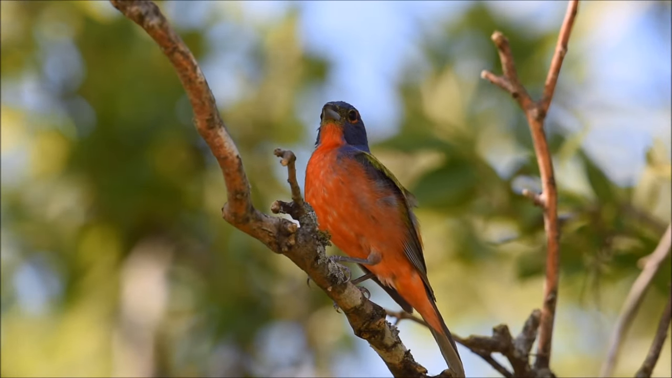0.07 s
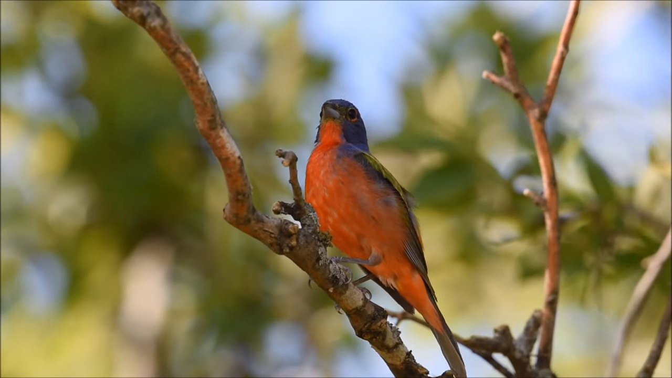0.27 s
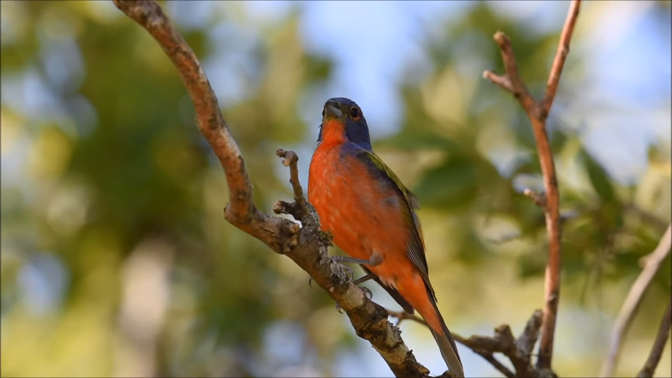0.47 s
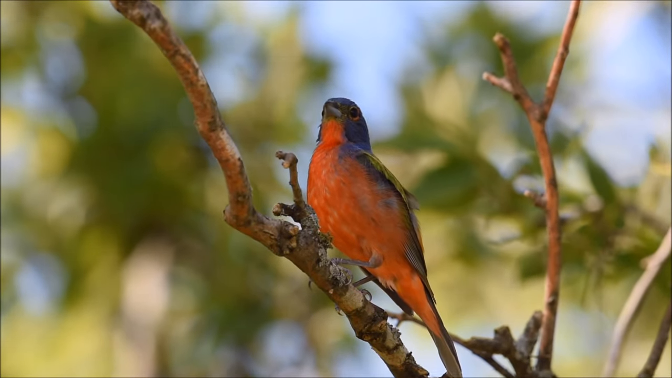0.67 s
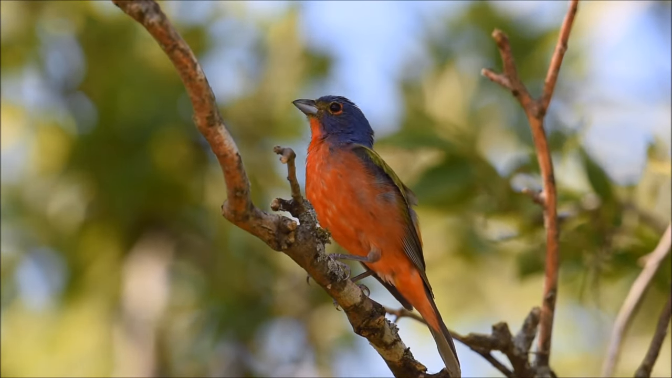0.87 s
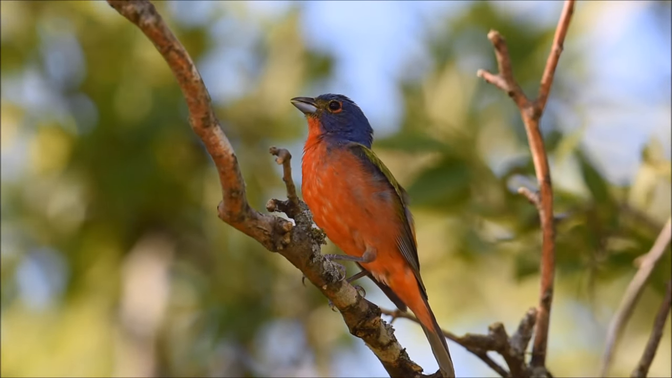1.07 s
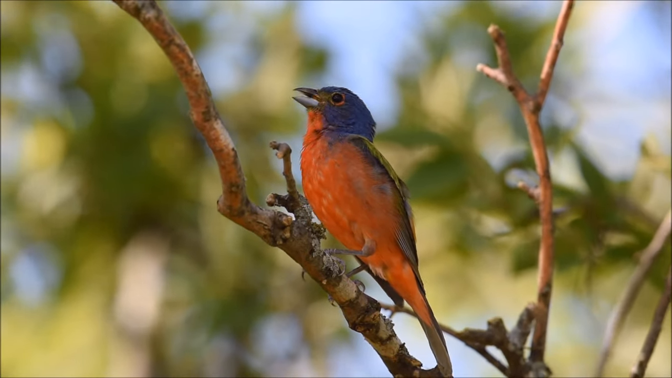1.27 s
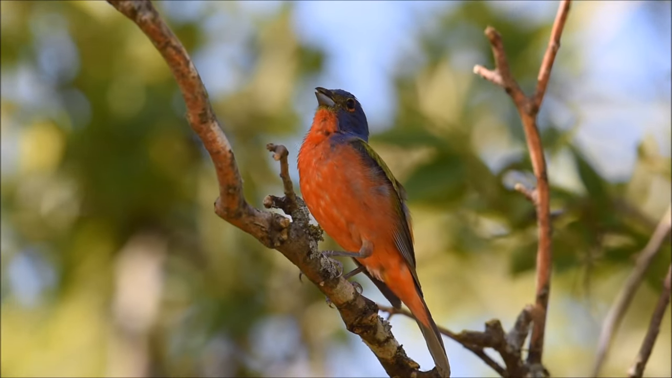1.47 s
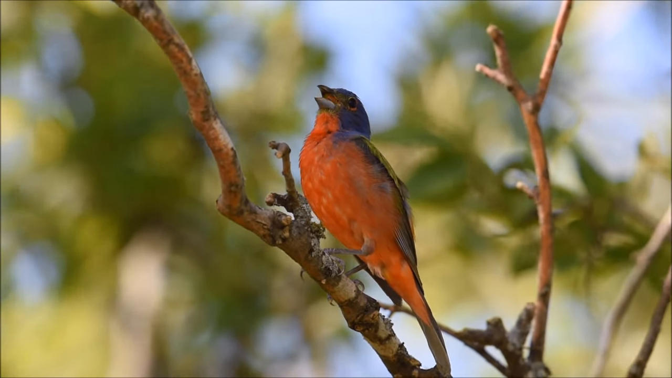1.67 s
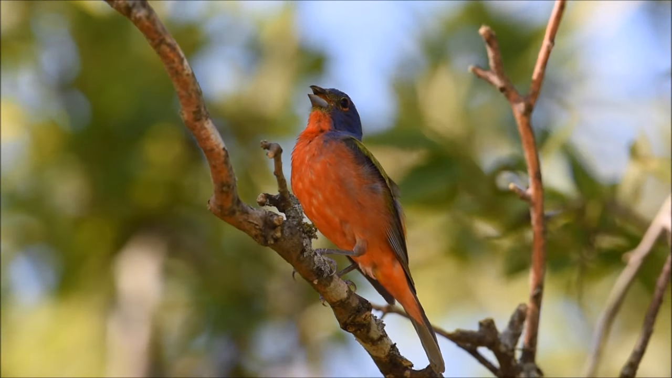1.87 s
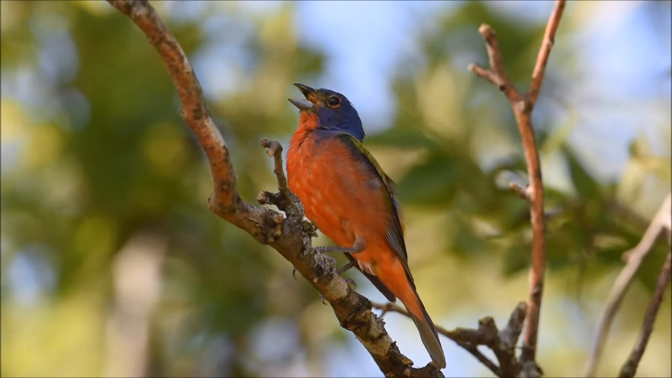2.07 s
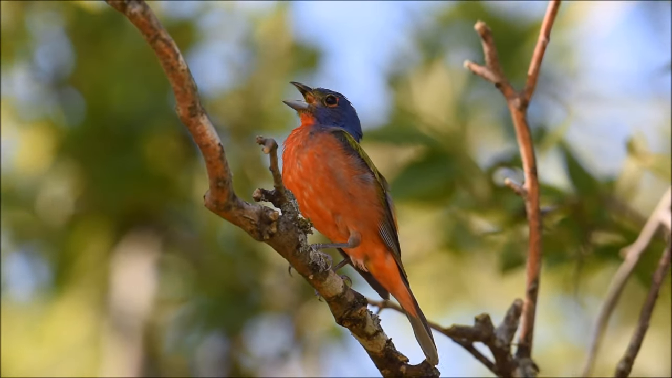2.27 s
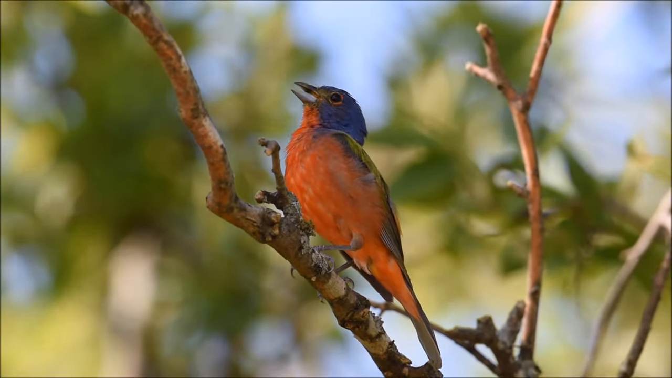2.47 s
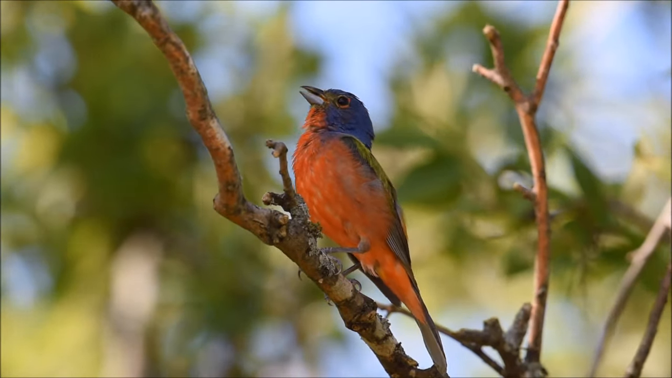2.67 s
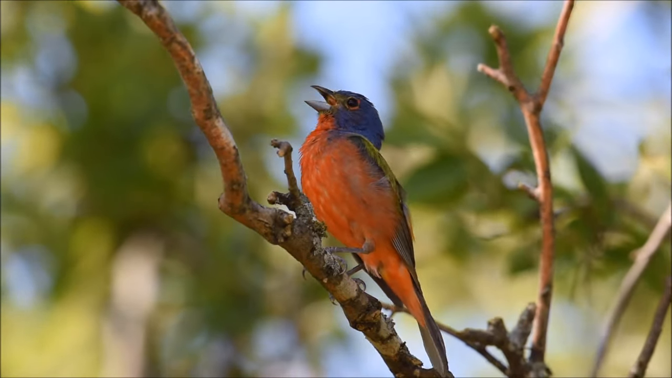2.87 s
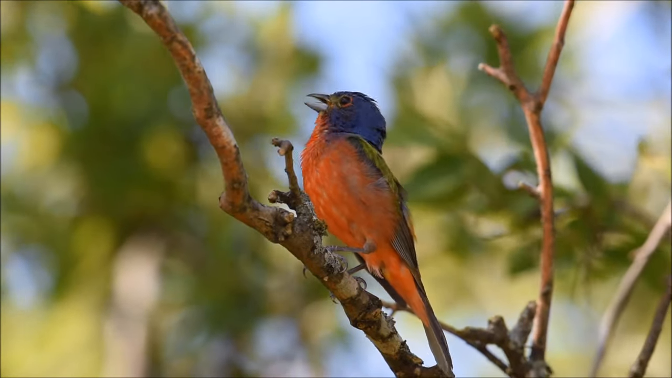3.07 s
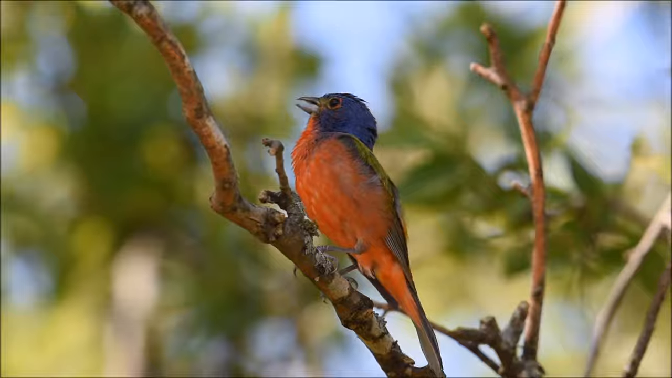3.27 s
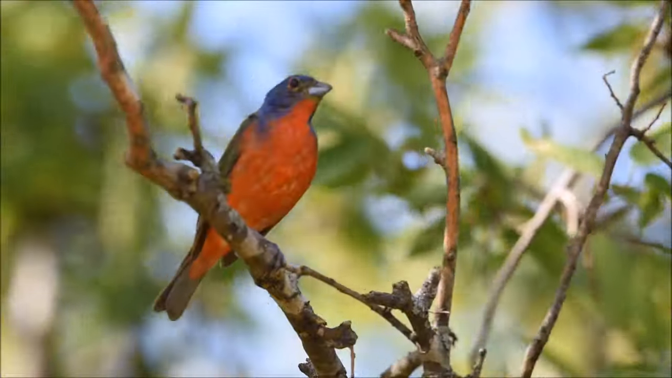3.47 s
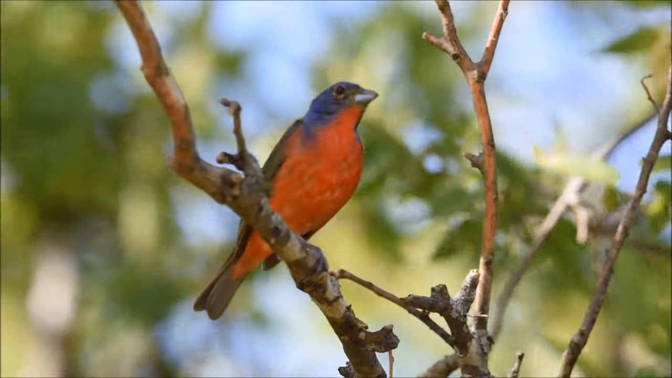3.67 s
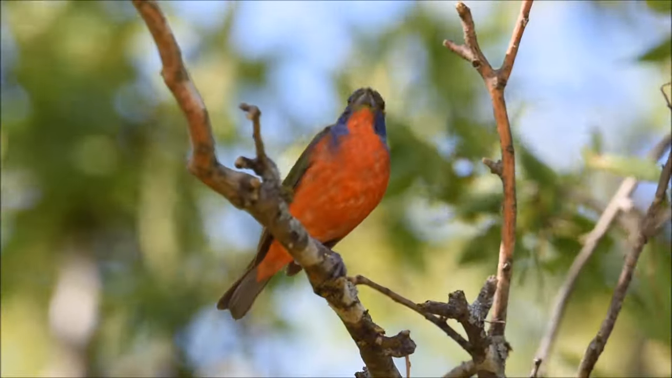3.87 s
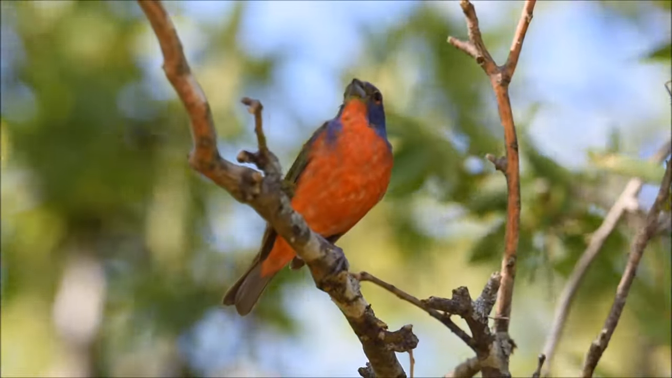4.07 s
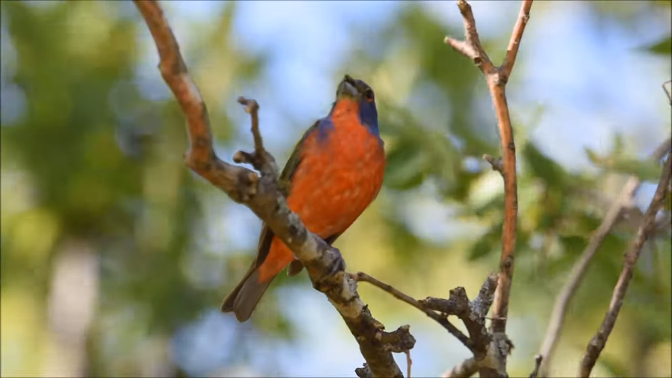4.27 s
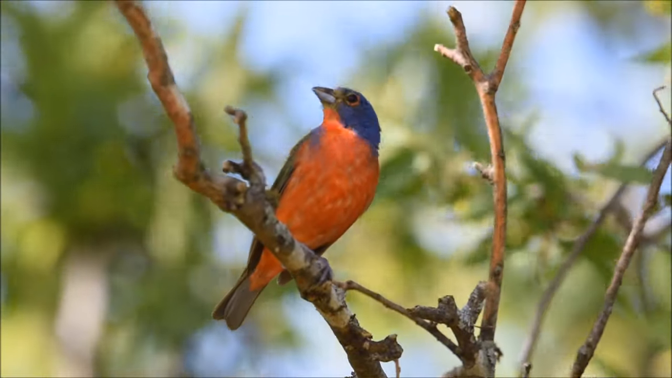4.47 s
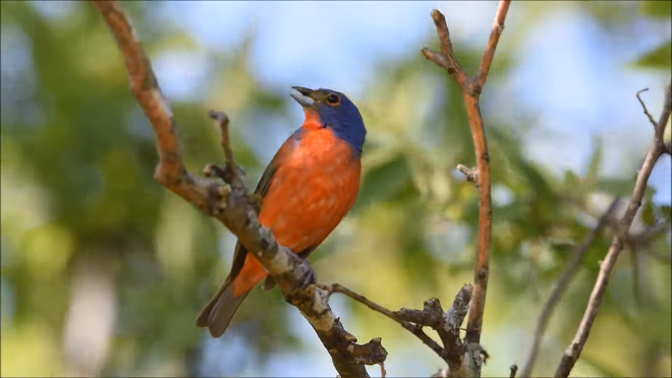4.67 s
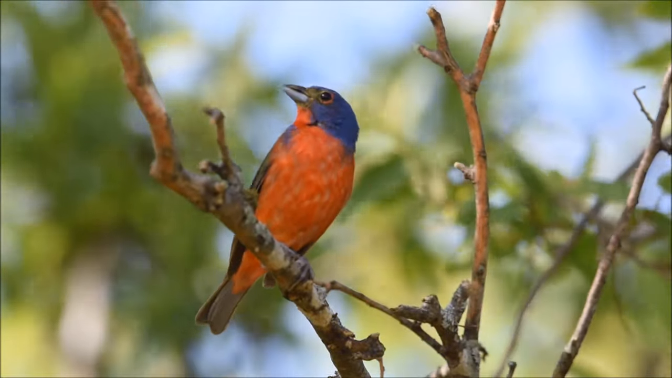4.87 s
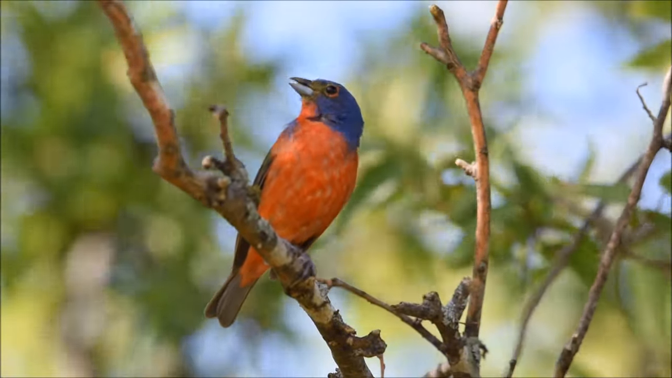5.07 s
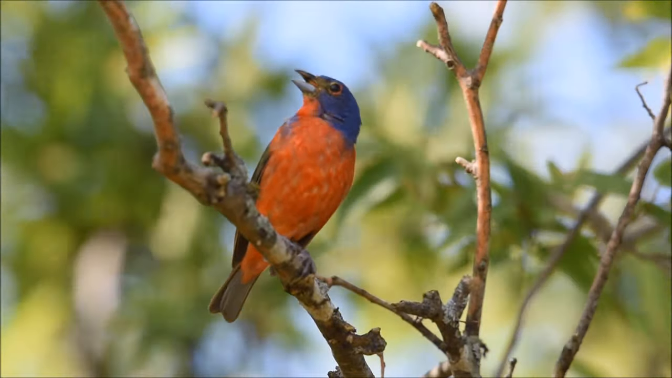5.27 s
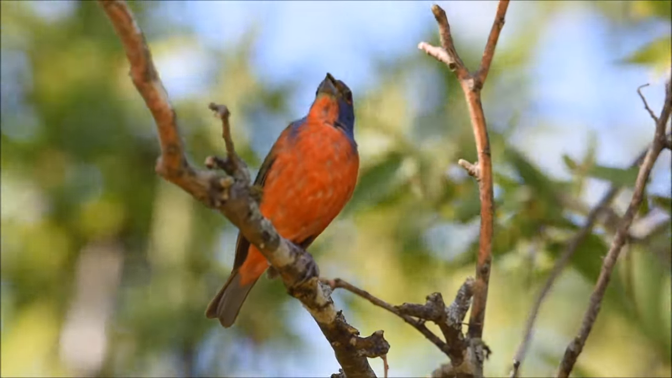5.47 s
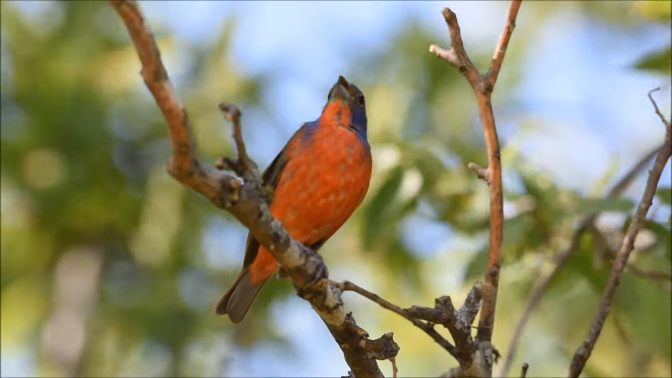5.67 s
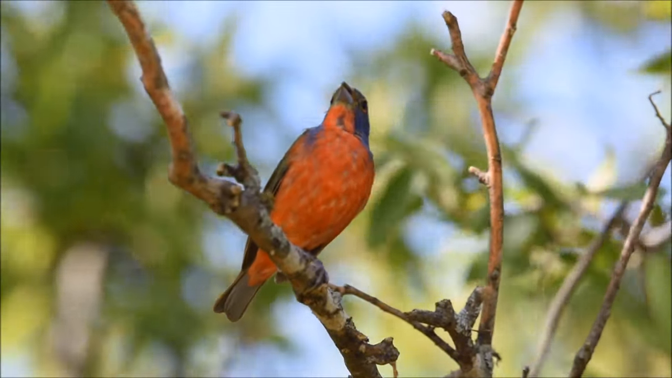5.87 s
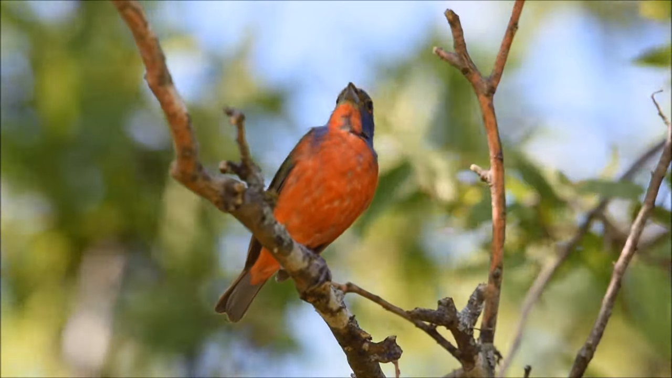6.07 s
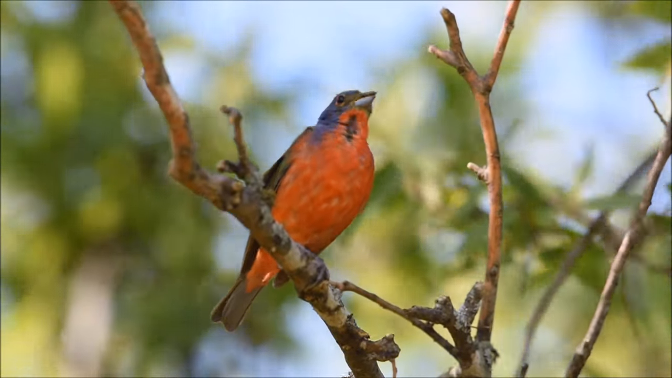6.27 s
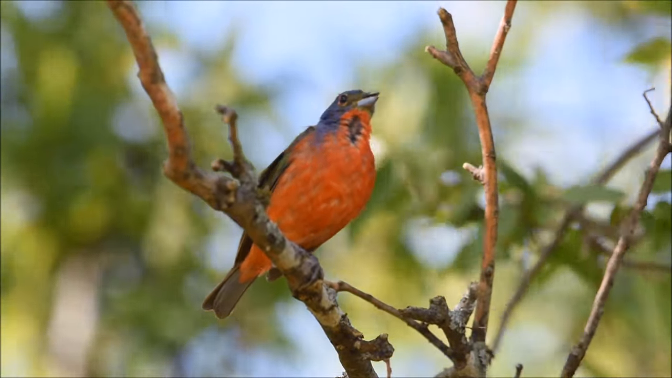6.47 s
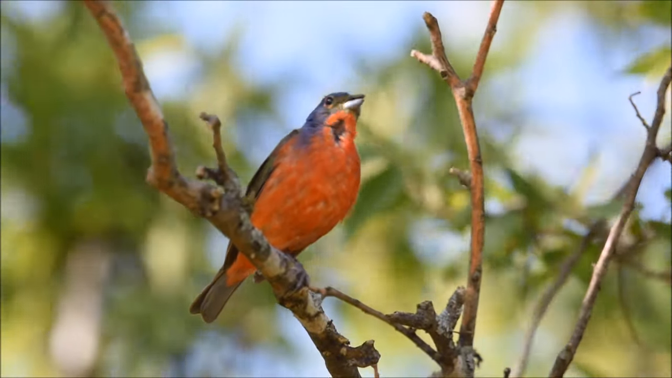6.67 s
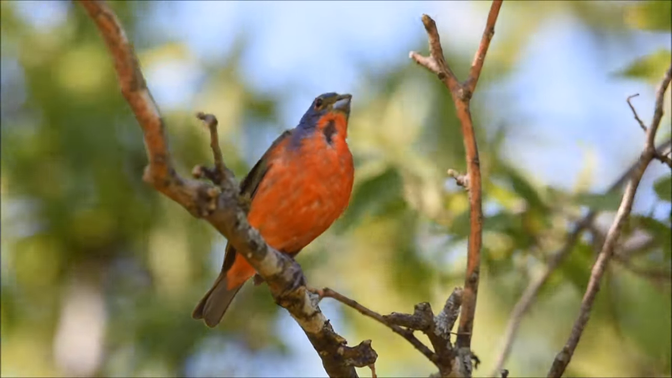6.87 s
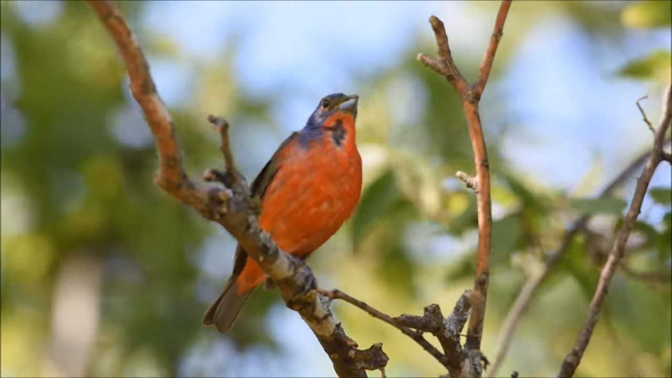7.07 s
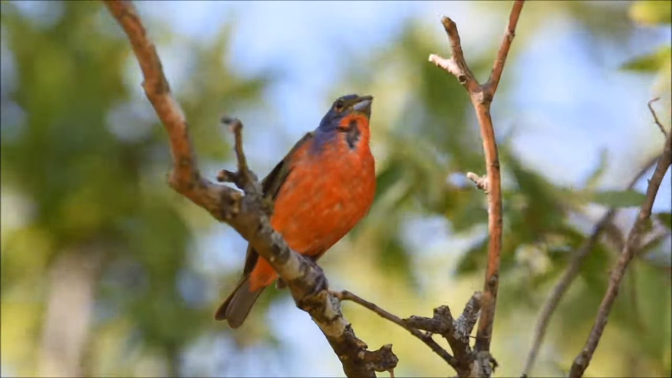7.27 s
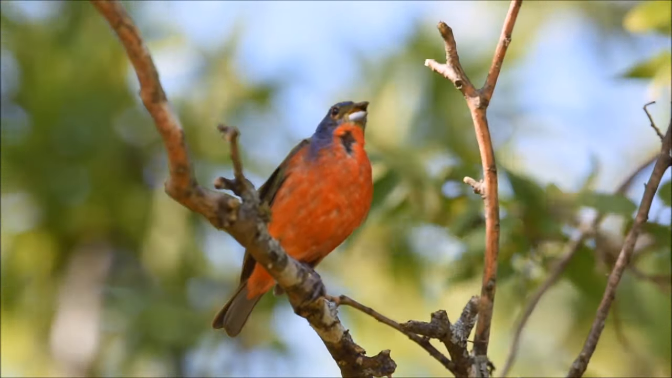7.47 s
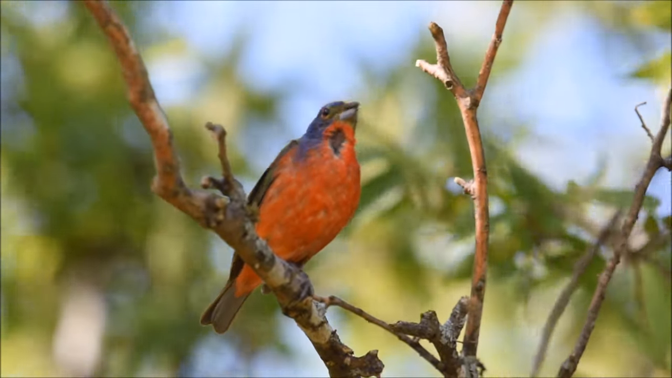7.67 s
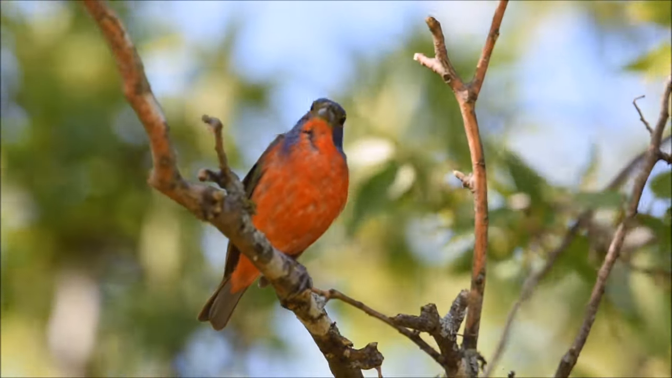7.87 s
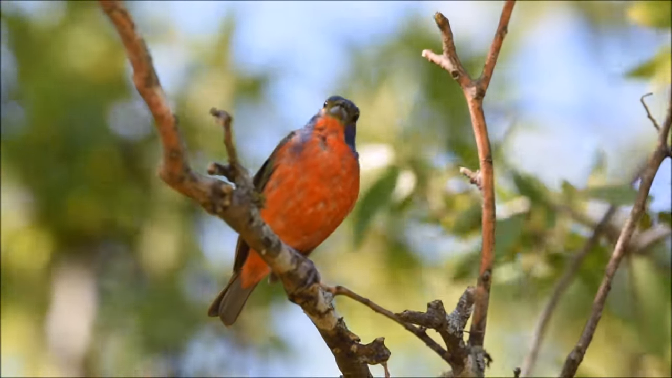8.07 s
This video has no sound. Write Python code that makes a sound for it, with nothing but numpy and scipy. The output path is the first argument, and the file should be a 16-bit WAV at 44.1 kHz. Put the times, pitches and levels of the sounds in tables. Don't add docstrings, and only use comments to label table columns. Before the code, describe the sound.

Close outdoor listening to one small bird on a branch, fairly dry with short scattered echoes from foliage. Its first quick high warble grows from soft chirps and stops at a brief total silence. A second song starts timidly, peaks, then softens towards the end. Behind it are a steady hollow distant hum, a passing low vehicle rumble during the first song, sparse twig ticks, faint leaf rustles, camera hiss and a soft final thud.

```python
import sys
import numpy as np
from scipy import signal
from scipy.fft import irfft, next_fast_len
from scipy.io import wavfile
from scipy.ndimage import uniform_filter1d

SR = 44100
rng = np.random.default_rng(int(sys.argv[2]) if len(sys.argv) > 2 else 0)


def ratio(d):
    e = np.asarray(d, float) / 20
    return 10 ** e


def digitize_waveform(pressure):
    field = np.atleast_2d(pressure).T
    bounded = np.clip(field, -1, 1)
    quanta = np.round(bounded * 32767).astype(np.int16)
    wavfile.write(sys.argv[1], SR, quanta)


N = 357651
TIME = np.arange(N) / SR
OPPOSITE = np.array([[1], [-1]])


def random_phase_noise(gain):
    return irfft(gain * np.exp(2j * np.pi * rng.random(len(gain))))[:N]


def noise_freqs():
    return np.fft.rfftfreq(next_fast_len(N), 1 / SR) + 1


def band(hz, width, order=2):
    f = noise_freqs()
    detune = (f - hz ** 2 / f) / width
    x = random_phase_noise((1 + detune ** 2) ** (-order / 2))
    return x / x.std()


def walk(rate):
    k = int(SR / rate)
    held = np.repeat(rng.standard_normal(N // k + 1), k)
    return 1.52 * uniform_filter1d(uniform_filter1d(held, k), k)[:N]


def pan(db):
    return ratio(np.array([db / 2, -db / 2]).reshape(2, -1))


CUT_S = (3.364, 3.408)


def by_take(first_db, second_db):
    return ratio(np.where(TIME < CUT_S[1], first_db, second_db))


# frequency in Hz, density in dB per Hz.
AIR = [(12, -43), (20, -4), (123, -8), (377, -15.5), (434, -12), (607, -5.5), (849, -17.5), (1030, -16),
       (1660, -19), (14300, -28.5), (16000, -36.5)]
AIR_DB = (-56.5, -55)


def air(apart_hz=2500):
    f = noise_freqs()
    hz, db = np.transpose(AIR)
    gain = ratio(np.interp(np.log(f), np.log(hz), db))
    side_share = 0.16 + 0.36 * f ** 2 / (f ** 2 + apart_hz ** 2)
    mid = random_phase_noise(gain * np.sqrt(1 - side_share))
    side = random_phase_noise(gain * np.sqrt(side_share))
    drift = ratio(0.28 * walk(6.1))
    return by_take(*AIR_DB) * drift * (mid + side * OPPOSITE) / mid.std()


# centre in Hz, width in Hz, level in dB before the scene changes,
# level in dB after it, left minus right in dB.
DRONE = [(253.5, 46, -70.5, -65.5, 0.5), (309, 64, -70, -63, -1), (443.6, 32, -56.5, -53.5, 0.5),
         (586.6, 69, -56, -57, -6), (674, 64, -58, -57, 4), (744.6, 44, -61.5, -58, -2.5),
         (916, 44, -72.5, -70, -3.5), (1018, 39, -66, -68, -2), (1190, 72, -79, -76, 4),
         (1956, 150, -70, -71.5, 0.5), (2191, 98, -72.5, -70.5, 1), (2640, 77, -78, -85, 8.5),
         (3650, 170, -77, -75.5, 3), (4300, 99, -74, -86.5, 0)]


def drone(apart_db=-15):
    out, throb = 0, walk(7)
    throb = throb - uniform_filter1d(throb, size=SR // 2)
    for hz, width, first_db, second_db, pan_db in DRONE:
        level = by_take(first_db, second_db) * ratio(1.9 * throb + 0.7 * walk(2.917))
        spread = ratio(apart_db) * band(hz, width) * OPPOSITE
        out = out + level * pan(pan_db) * (band(hz, width) + spread)
    return out


# time in seconds, level in dB.
RUMBLE = [(0, -59), (1.45, -60), (1.7, -54), (2.2, -53), (2.55, -48), (2.8, -49), (2.97, -52.5), (3.1, -59),
          (3.6, -61), (8.1, -61)]


def rumble():
    swell_db = np.interp(TIME, *np.transpose(RUMBLE)) - 2.0
    level = ratio(swell_db + 1.24 * walk(6))
    return level * (band(115, 100) + 0.088 * band(130, 60) * OPPOSITE)


# start in seconds, peak in dB.
TICKS = [(1.2124, -46), (1.2276, -37), (1.2605, -43), (1.3508, -36), (1.3747, -34), (3.8636, -51),
         (6.4694, -58), (7.1894, -40)]


def ticks(out, level_db=-3, decay_s=0.0003):
    t = np.arange(256) / SR
    for s, db in TICKS:
        crack = np.diff(rng.standard_normal(256) * np.exp(-t / decay_s), prepend=0)
        a = int(s * SR)
        out[a:a + 256] += ratio(db + level_db) * uniform_filter1d(crack, size=2)


def rustle(length, hz):
    u = np.linspace(0, 1, num=int(length * SR))
    edges = [0.55 * hz, min(1.7 * hz, SR / 2.2)]
    sos = signal.butter(2, edges, "bandpass", fs=SR, output="sos")
    noise = signal.sosfilt(sos, rng.standard_normal(len(u) + 2000))[2000:]
    grains = int(length * 300) + 2
    grain = np.interp(u, np.linspace(0, 1, num=grains), rng.standard_normal(grains))
    return ratio(2.5 * grain) * np.sin(np.pi * u) ** 0.6 * noise / noise.std()


# start in seconds, length in seconds,
# level in dB, centre in Hz.
RUSTLES = [(1.756, 0.12, -60.5, 6000), (1.859, 0.02, -53, 5500), (3.462, 0.013, -49.5, 1830),
           (3.51, .08, -59, 1000), (3.62, .08, -57, 1500), (3.72, .1, -62, 1800), (3.9, .06, -58, 900),
           (3.855, 0.021, -53, 4900), (7.9, .065, -53, 500), (2.64, 0.073, -61, 13000),
           (8.066, 0.025, -50, 750), (1.348, .04, -63, 7000), (1.222, .012, -63, 7000),
           (2.975, .035, -65, 13000), (6.04, .04, -65, 12000), (5.86, .04, -66, 12000),
           (3.1, .26, -60, 190), (3.42, .1, -58, 220), (3.858, .014, -60, 11000), (1.862, .014, -60, 13000)]


def rustles(out):
    for s, length, db, hz in RUSTLES:
        a = int(s * SR)
        out[a:a + int(length * SR)] += ratio(db) * rustle(length, hz)


# start in seconds, level in dB, pitch in Hz, 60 dB decay in seconds.
BUMPS = [
    (8.0705, -32, 255, 0.033),
    (8.079, -34, 144, 0.066),
    (3.467, -35, 990, 0.027),
]


def bumps(out):
    t = np.arange(SR // 8) / SR
    for s, db, hz, t60 in BUMPS:
        upper = 0.43 * np.sin(2 * np.pi * 2.31 * hz * t) * np.exp(-t / 0.024)
        ring = np.sin(2 * np.pi * hz * t) + upper
        a = int(s * SR)
        out[a:a + len(t)] += ratio(db) * ring * np.exp(-np.log(1000) * t / t60)


def small_sounds():
    out = np.zeros(N + SR)
    ticks(out)
    rustles(out)
    bumps(out)
    return out[:N]


def foliage(x, far_db=-12, far_t60=0.17, shared=0.55):
    near_db, near_t60, lumpy_db = -9.5, 0.06, 5
    leaf_hz = 3800
    t = np.arange(int(0.6 * SR)) / SR
    near, far = (np.exp(-np.log(1000) * t / t60) / np.sqrt(t60 * SR / 14) for t60 in (near_t60, far_t60))
    lumps = ratio(lumpy_db * rng.exponential(size=len(t)))
    near = near * lumps / np.sqrt(np.mean(lumps ** 2))
    onset = np.clip(t / 0.0046, 0, 1) ** 2
    shape = np.hypot(ratio(near_db) * near, ratio(far_db) * far) * onset
    mid, side = rng.standard_normal((2, len(t))) * shape
    shared = np.clip(shared, 0, 1)
    echo = np.sqrt((1 + shared) / 2) * mid + np.sqrt((1 - shared) / 2) * side * OPPOSITE
    echo[:, int(0.007 * SR)] += ratio(-11)
    bright = np.diff(x, prepend=0) * SR / (2 * np.pi * leaf_hz)
    return signal.fftconvolve(bright[None], echo, axes=1)[:, :N]


# centre in Hz, width in Hz, gain in dB.
THROAT = [(5750, 500, -21), (10500, 700, -36), (14300, 1300, -28)]


def throat(hz, faint_db=-50):
    peaks = sum(ratio(db) * np.exp(-((hz - centre) / width) ** 2) for centre, width, db in THROAT)
    return ratio(faint_db) + peaks


# seconds after the start, pitch in Hz, level in dB under the peak.
DROOP = [(0, 4480, -18), (.034, 4050, 0), (.057, 3850, -7), (.095, 3830, -15), (.13, 3850, -25)]
HOOK = [(0, 3600, -28), (.009, 4050, -16), (.023, 4640, 0), (.029, 4400, -9), (.036, 3500, -9),
        (.043, 3270, -12), (.061, 3500, -9), (.078, 4080, -4), (.093, 4440, -13)]
SQUEAK = [(0, 6300, -14), (.005, 5600, -2), (.012, 5600, -3), (.02, 6300, 0), (.028, 7000, -11),
          (.036, 8700, -24), (.05, 8000, -17), (.06, 7550, -5), (.082, 7150, -14)]
DIP = [(0, 4190, -15), (.012, 4460, -9), (.02, 3980, 0), (.032, 2920, -9), (.045, 3620, -2),
       (.062, 4020, -2.5), (.105, 3320, -10)]
SCOOP = [(0, 4180, -17), (.008, 4070, 0), (.025, 3180, -6), (.045, 3600, -6.5), (.07, 3600, -12)]
DIVE = [(0, 4440, -22), (.016, 4270, -18), (.023, 4500, 0), (.03, 6600, -18), (.038, 6330, -11),
        (.053, 5950, -10), (.059, 5750, 0), (.071, 5130, -2.5), (.091, 4460, -15)]
LADLE = [(0, 2800, -28), (.014, 4440, -12), (.027, 3650, -5), (.055, 3040, -12), (.071, 3100, -15),
         (.096, 3480, -11), (.117, 4080, 0), (.157, 4010, -13)]
PEAK = [(0, 4050, -22), (.01, 4400, -7), (.026, 4550, -7), (.035, 4750, 0), (.042, 5300, -12),
        (.054, 6500, -22), (.062, 5700, -8), (.072, 4900, -6), (.086, 4150, -16)]
CREST = [(0, 4450, -12), (.018, 5350, -5), (.035, 5620, 0), (.044, 5350, -12), (.056, 4370, -3),
         (.078, 3860, -10), (.108, 4200, -12), (.128, 4400, -18)]
TWIN = [(0, 4350, -24), (.012, 4550, -3), (.022, 4250, 0), (.034, 3550, -6), (.047, 4350, -2),
        (.061, 3700, -4), (.081, 3150, -8), (.106, 3780, -8), (.142, 3880, -10)]
SWOOP = [(0, 3600, -35), (.012, 3900, -22), (.017, 3980, -10), (.035, 3080, -11), (.085, 4860, -5),
         (.104, 5280, -12), (.111, 4850, 0), (.13, 3700, -6.5), (.143, 3370, -12.5)]
DROP = [(0, 4300, -14), (.004, 2900, -12), (.01, 3050, 0), (.018, 2800, -5), (.025, 2450, -14),
        (.042, 2400, -18)]
HUMP = [(0, 2730, -21), (.012, 3200, -8), (.032, 4000, 0), (.059, 3400, -1), (.066, 3450, -14),
        (.079, 3270, -7), (.092, 3280, -12), (.1, 3400, -22)]
ZIGZAG = [(0, 3280, -24), (.012, 5230, -15), (.022, 4260, -18), (.03, 4080, 0), (.04, 3480, -14),
          (.048, 4340, -9), (.057, 4350, -5), (.082, 3090, -14), (.103, 4050, -20)]
STEP = [(0, 3470, -31), (.01, 3645, -3), (.029, 3650, 0), (.038, 3050, -12), (.046, 4260, -9),
        (.058, 4645, 0), (.106, 4005, 0), (.123, 4020, -21)]
CLIMB = [(0, 3550, -20), (.037, 3850, -3.5), (.058, 4560, -1), (.076, 4760, -10), (.094, 4200, -5),
         (.116, 4130, -14)]
LEAD = [(0, 5200, -18), (.012, 5050, -6), (.022, 5180, 0), (.029, 5550, -1), (.039, 4050, -3),
        (.045, 4300, 0), (.053, 4500, -3), (.06, 4400, -6), (.067, 3750, -5)]
SPIRE = [(0, 4100, -24), (.036, 4400, -13), (.043, 4550, 0), (.052, 5300, -16), (.063, 6650, -22),
         (.069, 6100, -15), (.076, 4500, -6), (.082, 4020, -7), (.097, 3920, -17)]
NOTCH = [(0, 5020, -14), (.02, 5150, -6), (.034, 5400, 0), (.042, 5800, -6), (.047, 6600, -18),
         (.054, 5200, -12), (.067, 4600, 0), (.089, 4350, -14)]
VALLEY = [(0, 4360, -21), (.017, 4610, -5), (.04, 5000, -13), (.047, 4610, 0), (.059, 3800, -1),
          (.077, 3560, -4), (.106, 3650, -5), (.132, 4030, -2), (.149, 4100, -17)]
HICCUP = [(0, 2970, -22), (.01, 3120, -5), (.027, 3250, 0), (.032, 3600, -6), (.038, 2800, -10),
          (.046, 2200, -20), (.058, 2300, -18), (.067, 3450, -5), (.075, 2800, -9)]
SLUR = [(0, 4250, -22), (.009, 4420, -2), (.029, 4140, 0), (.037, 3600, -5)]
CROOK = [(0, 3700, -26), (.008, 4050, -16), (.024, 4560, 0), (.03, 3900, -15), (.04, 3200, -17),
         (.05, 3450, -17), (.055, 3600, -2), (.065, 3620, 0), (.082, 4120, -6), (.097, 4450, -19)]
CREEP = [(0, 4550, -22), (.012, 4800, -7), (.024, 4980, 0), (.036, 5100, -12), (.048, 6900, -26),
         (.056, 6300, -22), (.064, 5800, -9), (.07, 5450, 0), (.088, 4600, -8)]
SQUEAL = [(0, 5600, -15), (.004, 5000, 0), (.009, 5600, 0), (.014, 6600, -9), (.018, 7000, -12),
          (.028, 7600, -19), (.038, 7050, -6), (.05, 6800, -7), (.066, 6300, -14)]
UNDER = [(0, 5400, -12), (.01, 5550, -3), (.02, 5850, -7), (.027, 5500, 0), (.032, 5050, -2),
         (.044, 5050, -10)]
PIP = [(0, 3300, -20), (.011, 3530, -5), (.018, 3450, -11), (.028, 3420, 0), (.04, 3460, -5),
       (.046, 3440, -20), (.05, 3420, -5), (.057, 3440, -16), (.09, 3420, -25)]
OPENER = [(0, 3420, -18), (.01, 3500, -5), (.019, 3680, 0), (.023, 3800, -4)]
BARB = [(0, 4100, -18), (.011, 3900, -14), (.02, 4700, 0), (.028, 4550, -1), (.034, 3600, -12),
        (.043, 3250, -11), (.062, 3500, -8), (.078, 4100, -1), (.088, 4500, -12)]
FALL = [(0, 5400, -16), (.006, 5450, -3), (.012, 5100, 0), (.022, 4000, -8)]
PAIR = [(0, 4500, -18), (.01, 4900, -2), (.027, 3950, 0), (.036, 4600, -4), (.044, 4600, -3),
        (.066, 3250, -8), (.08, 3800, -15), (.09, 4150, -8), (.118, 4150, -9)]
BLIP = [(0, 4400, -18), (.008, 4520, -10), (.014, 4360, -9), (.023, 4320, 0), (.031, 4300, -5),
        (.036, 4300, -12)]
CURL = [(0, 4300, -24), (.014, 4480, -17), (.022, 4270, -5), (.03, 4150, -6), (.043, 4050, 0),
        (.06, 3930, -4), (.066, 3870, -9), (.09, 3840, -9), (.15, 3850, -27)]
NUDGE = [(0, 4100, -14), (.013, 4150, 0), (.021, 4240, -5), (.027, 4260, 0), (.036, 4280, -2),
         (.04, 4280, -14)]
PERCH = [(0, 4300, -6), (.005, 4300, -8), (.012, 4400, 0), (.021, 4480, -9), (.028, 4400, -5),
         (.042, 4370, -17)]
SIGH = [(0, 2250, -5), (.012, 2300, -14), (.022, 2400, -8), (.03, 2550, -13), (.042, 2740, -2),
        (.052, 2830, 0), (.062, 2850, -8)]
FLOP = [(0, 2950, -17), (.007, 3400, -6), (.014, 3650, 0), (.023, 3350, -3), (.033, 3180, 0),
        (.041, 3030, -3), (.052, 2800, -14)]
# shape, start in seconds, stretch in time, pitch factor, peak in dB.
REPEATED = [
    (DROOP, 3.868, .8, 1.01, -45),
    (HOOK, 2.012, 1.01, 1.0, -26),
    (TWIN, 5.061, .97, 1.0, -37.5),
]
# shape, start in seconds, peak in dB.
ONCE = [(DIP, 2.443, -30), (DIVE, 2.606, -28), (LADLE, 2.738, -25.5), (SPIRE, 3.252, -26),
        (SCOOP, 4.477, -41.5), (CREST, 4.649, -36.5), (LEAD, 5.604, -31), (SWOOP, 5.771, -25.5),
        (DROP, 6.135, -40), (HUMP, 6.183, -35), (ZIGZAG, 6.275, -31.5), (HICCUP, 6.645, -36),
        (VALLEY, 6.774, -36.5), (STEP, 7.135, -33), (SLUR, 7.326, -35.5), (NOTCH, 7.511, -38),
        (CLIMB, 7.732, -34), (CROOK, 1.856, -32), (CREEP, 5.284, -34), (PEAK, 6.002, -26),
        (SQUEAK, 2.324, -35.5), (SQUEAL, 7.002, -43), (UNDER, 7.04, -46), (PIP, 1.557, -38),
        (OPENER, 3.042, -29), (BARB, 2.17, -25), (FALL, 2.96, -29), (PAIR, 6.463, -35), (BLIP, 1.205, -41),
        (CURL, 1.328, -35), (NUDGE, 1.723, -40), (PERCH, 1.771, -38), (FLOP, 7.959, -42),
        (SIGH, 8.029, -54)]


def syllables():
    for shape, start, stretch, factor, db in REPEATED + [(shape, start, 1, 1, db) for shape, start, db in ONCE]:
        s, hz, under = np.transpose(shape)
        yield start + stretch * s, factor * hz, db + under


# start in seconds, length in seconds, from Hz, to Hz, peak in dB.
SLIDES = [(1.01, .065, 3750, 4000, -52), (2.983, .021, 6350, 4400, -31), (3.728, .04, 4380, 4360, -52),
          (4.142, .054, 3200, 3300, -41), (4.305, .08, 4080, 4430, -39), (4.972, .032, 2800, 3300, -50),
          (5.524, .04, 2720, 3050, -46), (7.422, .04, 3550, 3720, -40)]
# start in seconds, length in seconds, foot in Hz, top in Hz, peak in dB.
ARCHES = [
    (7.666, .03, 3030, 4140, -36),
]


def slides_and_arches(swell_db=15, swell_peak=0.42, arch_top=0.38):
    u = np.linspace(0, 1, num=40)
    off_peak = np.where(u < swell_peak, 1 - u / swell_peak, (u - swell_peak) / (1 - swell_peak))
    swell = -swell_db * off_peak ** 2
    bow = np.sin(np.pi * np.interp(u, [0, arch_top, 1], [0, 0.5, 1]))
    for rows, path in ((SLIDES, u), (ARCHES, bow)):
        for start, length, from_hz, to_hz, db in rows:
            yield start + length * u, from_hz + (to_hz - from_hz) * path, db + swell


# seconds into the turn, pitch factor, level in dB.
FLICK = [(0, .92, -15), (.005, .96, -9), (.014, 1.0, 0), (.0175, 1.18, -4), (.021, 1.0, -2),
         (.0245, .83, -11), (.031, .92, -15)]
WARBLE = [(0, 1.0, -7), (.006, .82, -10), (.011, .89, -4), (.022, .935, 0), (.029, .97, -3),
          (.033, 1.0, -7)]
RIPPLE = [(0, .85, -9), (.008, .97, -3), (.019, 1.0, 0), (.026, .85, -9)]
QUAVER = [(0, .82, -8), (.005, .93, -2), (.011, .99, 0), (.016, 1.0, -6), (.02, .94, 3), (.0245, .82, -8)]
# turn, start in seconds, length in seconds, pitch in Hz, first level in dB, last level in dB.
TRILLED = [
    (WARBLE, 3.065, .135, 3740, -28, -35.5),
    (FLICK, 4.879, .089, 3250, -42.5, -40),
    (FLICK, 5.434, .086, 3150, -35, -35),
    (QUAVER, 5.672, .066, 4720, -28, -35),
    (RIPPLE, 7.366, .056, 3800, -41, -41),
]


def trills(uneven_db=1.1, uneven_reach=0.12, sag_per_db=0.009):
    for turn, start, length, hz, first_db, last_db in TRILLED:
        s = np.linspace(0, length, num=200)
        into, factor, under = np.transpose(turn)
        place = s % into[-1]
        effort = (last_db - first_db) * s / length
        push, reach = rng.standard_normal((8, 2))[(s // into[-1]).astype(int)].T
        swing = 1 + (np.interp(place, into, factor) - factor[0]) * (1 + uneven_reach * reach) / factor[0]
        pitch = hz * factor[0] * (1 + sag_per_db * effort) * uniform_filter1d(swing, size=5)
        pulse = np.interp(place, into, under) + uniform_filter1d(uneven_db * push, size=15)
        yield start + s, pitch, first_db + effort + pulse


def bird(third_db=-11, flutter_db=2.2, attack_s=0.003, release_s=0.0094):
    out, flutter, wobble = np.zeros(N), ratio(flutter_db * walk(130)), 1 + 0.0036 * walk(300)
    for s, hz, db in [*syllables(), *slides_and_arches(), *trills()]:
        a, b = int((s[0] - attack_s) * SR), min(int((s[-1] + release_s) * SR), N)
        t = TIME[a:b]
        pitch = uniform_filter1d(np.interp(t, s, hz), size=60)
        phase = 2 * np.pi * np.cumsum(pitch * wobble[a:b]) / SR
        edge = np.clip(np.minimum((t - t[0]) / attack_s, (t[-1] - t) / release_s), 0, 1) ** 2
        second = throat(2 * pitch) * np.sin(2 * phase)
        third = ratio(third_db) * throat(3 * pitch) * np.sin(3 * phase)
        out[a:b] += ratio(np.interp(t, s, db)) * edge * (np.sin(phase) + second + third)
    return ratio(2.5) * out * flutter


# time in seconds, left minus right in dB.
SONG_PAN = [(1, 0.5), (3.4, -.5), (5.5, -2.5), (8.1, -2.5)]


def song_among_leaves():
    song = bird()
    return (ratio(-1.0) * song + foliage(song)) * pan(np.interp(TIME, *np.transpose(SONG_PAN)))


def scene():
    return air() + drone() + rumble() + small_sounds() + song_among_leaves()


def line_whine(hz=15623):
    tone = ratio(-71) * np.sin(2 * np.pi * hz * TIME + np.array([[0], [1.4]]))
    return (tone + ratio(-86) * band(hz, 300)) * pan(-2.5)


def band_limit(x):
    return signal.sosfilt(signal.butter(12, 15780, fs=SR, output="sos"), x)


def record(dry):
    running = (TIME < CUT_S[0]) | (TIME > CUT_S[1])
    top_cut = signal.ellip(10, 0.2, 80, 15830, fs=SR, output="sos")
    mix = signal.sosfilt(top_cut, dry + line_whine()) * running
    return band_limit(mix)


dry = scene()
out = record(dry)
digitize_waveform(out)
```